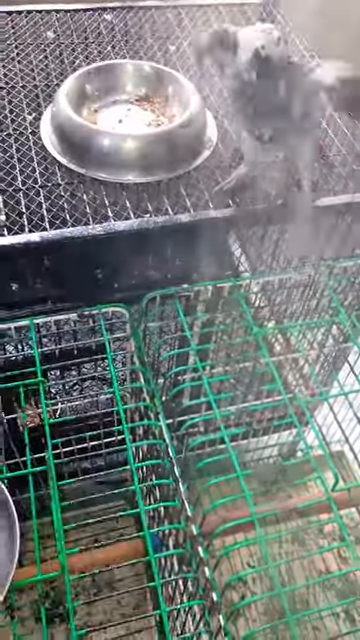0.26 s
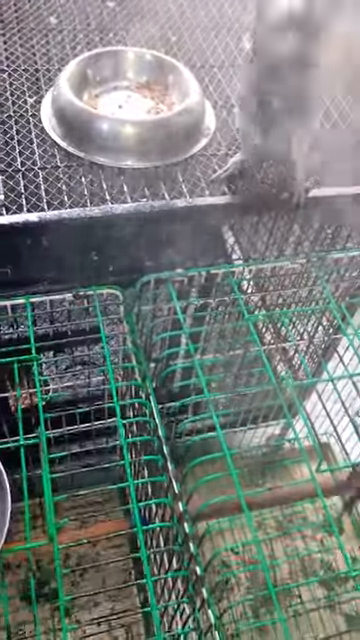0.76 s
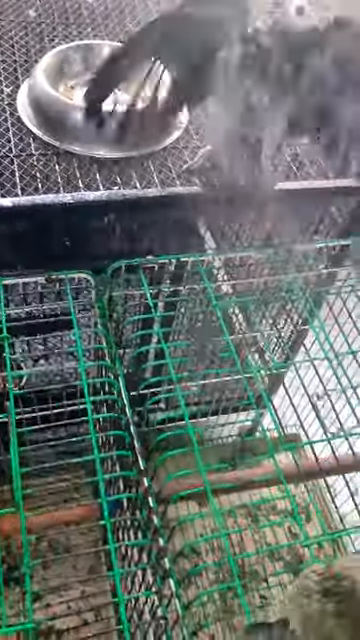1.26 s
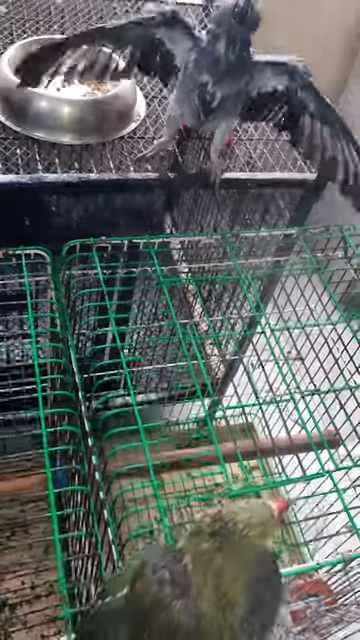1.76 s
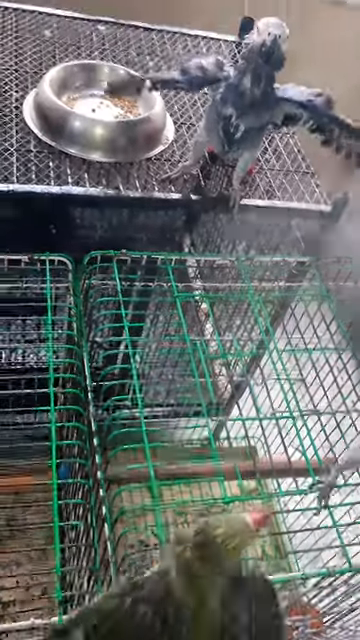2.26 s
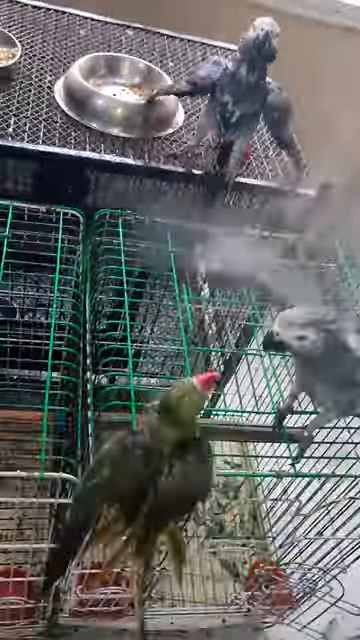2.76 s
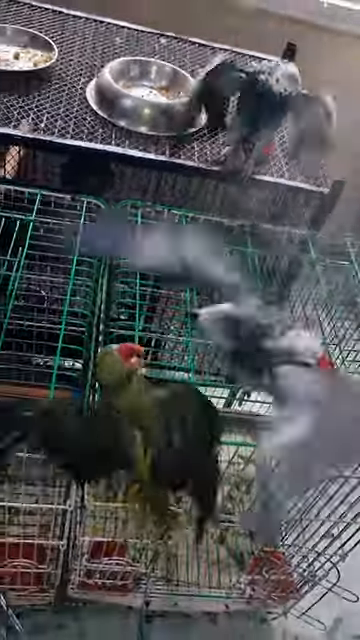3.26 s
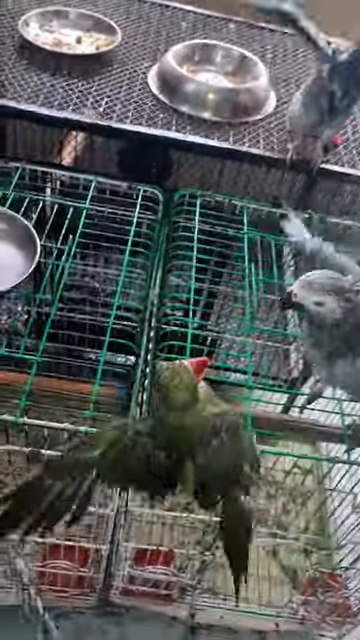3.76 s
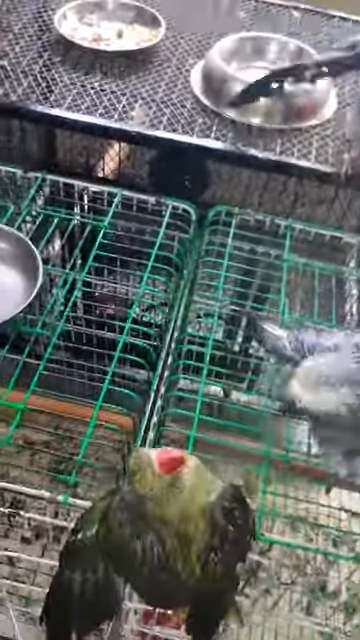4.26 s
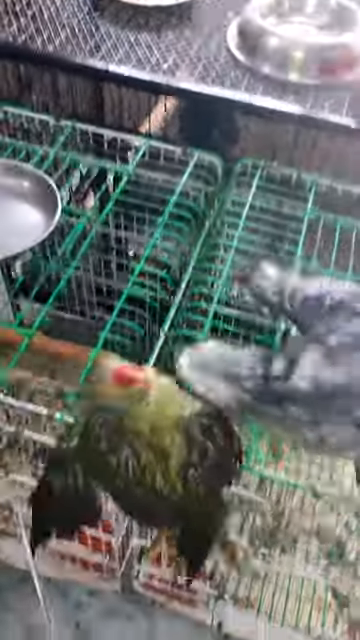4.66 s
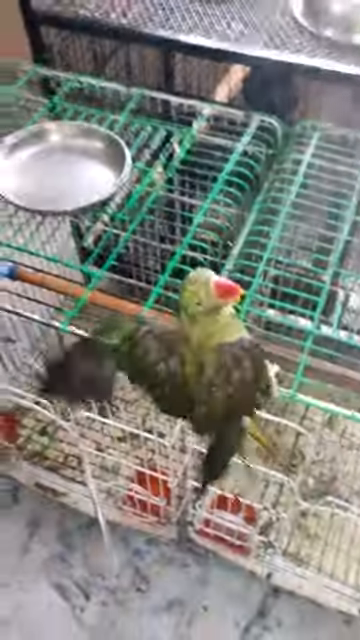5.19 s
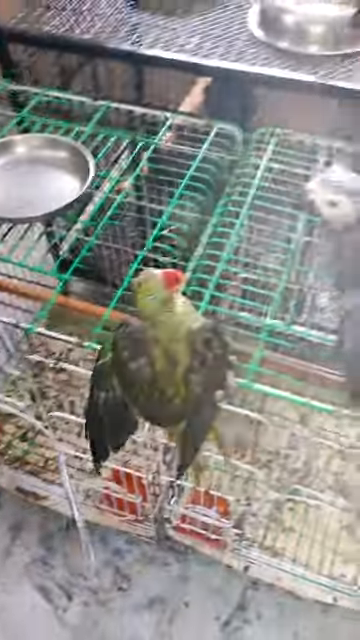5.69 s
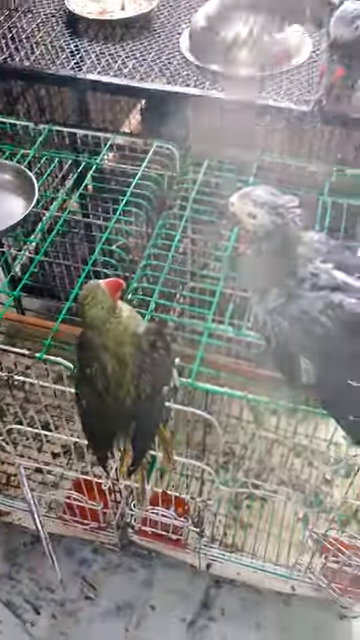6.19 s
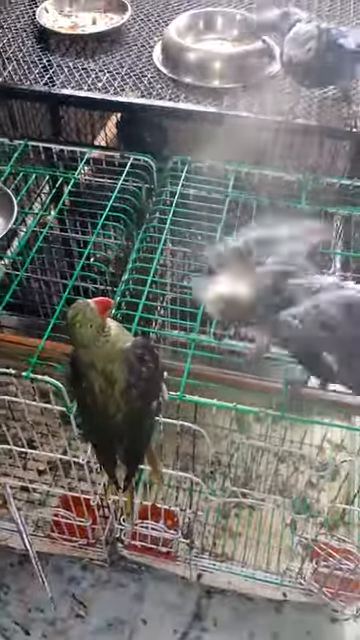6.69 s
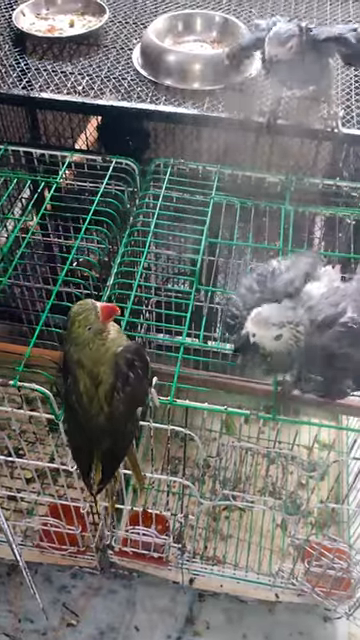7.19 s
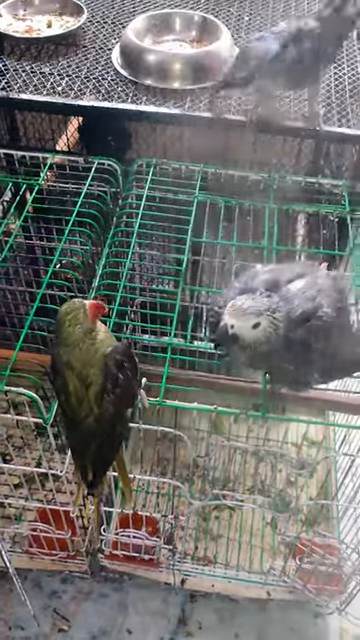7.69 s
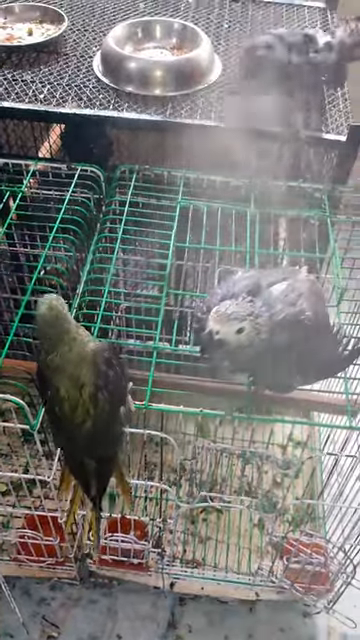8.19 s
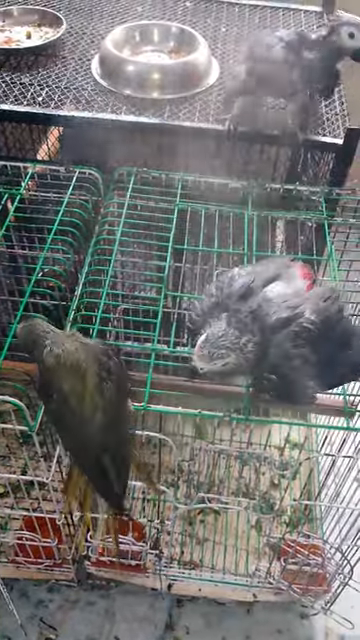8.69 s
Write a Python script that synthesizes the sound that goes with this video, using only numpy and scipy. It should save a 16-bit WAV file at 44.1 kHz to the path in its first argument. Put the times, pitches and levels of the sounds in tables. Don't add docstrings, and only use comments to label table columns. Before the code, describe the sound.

Several parrots squabble on wire cages indoors, with dense chirping, short harsh squawks, beating wings and sharp claw ticks on the mesh.

```python
import sys
import numpy as np
from scipy import signal
from scipy.io import wavfile
from scipy.ndimage import uniform_filter1d

SR = 44100
rng = np.random.default_rng(int(sys.argv[2]) if len(sys.argv) > 2 else 0)


def rack_gain(trim_db):
    fader = np.asarray(trim_db, float)
    return 10 ** (fader / 20)


def store_pcm(level_fs):
    pcm = np.round(np.clip(level_fs, -1, 1) * 32767).astype(np.int16)
    wavfile.write(sys.argv[1], SR, np.atleast_2d(pcm).T)


N = 394254

# t/s, length/s, throat start f/Hz, throat end f/Hz, level/dB
DEEP_SQUAWKS = [(1.227, 0.096, 2700, 2170, -21), (1.212, .1, 1510, 1070, -30.5),
                (2.279, 0.037, 1620, 1640, -26), (3.368, 0.11, 1360, 2600, -18.5),
                (4.83, .03, 670, 800, -29.5), (1.3, 0.0304, 4200, 5000, -29),
                (4.878, 0.062, 2700, 4100, -25), (4.856, 0.12, 4500, 4800, -33),
                (5.428, 0.11, 1060, 1010, -41), (5.428, 0.049, 2100, 2500, -24),
                (5.528, 0.083, 2200, 2400, -28.5), (5.841, 0.062, 2400, 1840, -26),
                (7.598, 0.1, 2000, 1810, -34.5)]
MIDDLE_SQUAWKS = [
    (3.204, .14, 1560, 1671, -31),
    (3.33, 0.081, 800, 1300, -27),
    (4.845, 0.094, 900, 1250, -23.5),
    (4.87, .065, 1750, 1850, -24),
]
SHRILL_SQUAWKS = [
    (2.388, 0.046, 890, 1520, -31.5),
    (5.097, 0.087, 800, 830, -36),
    (5.1, 0.071, 1650, 1700, -32),
]
DEEP_HZ, MIDDLE_HZ, SHRILL_HZ = 408.7, 582.4, 819
GRIT_DB = 3.5
# t/s, start f/Hz, end f/Hz, level/dB, fall per partial/dB
COOS = [
    (4.608, 360, 475, -46.5, 8),
    (5.814, 697, 376.4, -51, 8),
    (7.555, 723, 370, -52, 6),
    (8.9, 560, 640, -54.5, 11),
    (3.275, 638, 569, -45, 7),
    (5.095, 790, 815, -48, 7),
]
COO_S, COO_ROUGH = .12, .03

# t/s, length/s, loudest partial f/Hz, peak level/dB
CLEAR_CHIRPS = [(0.392, 0.023, 3590, -31), (2.847, 0.019, 3990, -30), (3.573, 0.071, 3360, -27.5),
                (4.423, 0.0064, 3425, -24), (4.659, 0.012, 3740, -24.5), (4.777, 0.006, 3440, -19),
                (5.956, 0.016, 3580, -26.5), (6.727, 0.039, 2860, -36.5), (6.789, 0.094, 2920, -46.5),
                (7.32, 0.046, 3380, -34), (7.861, 0.022, 3850, -25.5), (7.893, 0.077, 4080, -33),
                (.006, 0.052, 4915, -21.5), (0.045, 0.024, 6330, -27.5), (1.717, 0.092, 7000, -29.5),
               (2.855, 0.045, 6460, -29.5), (3.107, 0.077, 4920, -27), (3.317, 0.099, 5020, -25.5),
               (4.315, 0.034, 5600, -37.5), (4.636, 0.03, 6130, -31), (5.586, 0.062, 6460, -30),
               (5.626, 0.1, 5340, -26), (6.22, 0.022, 5720, -34), (6.329, 0.024, 5640, -27),
               (7.15, 0.045, 6110, -28.5), (7.225, 0.09, 5980, -38), (7.584, 0.055, 4870, -32),
               (8.046, 0.1, 4950, -35.5), (8.614, 0.06, 4980, -31.5)]
# t/s, length/s, loudest partial f/Hz, peak level/dB, glide ratio
SLIDING_CHIRPS = [(0.058, 0.045, 5200, -25, 1.06), (0.979, 0.15, 4400, -40, 0.89),
                  (1.4, 0.14, 3800, -27, 1.04), (2.831, 0.06, 4760, -22.5, 1.07),
                  (2.884, 0.061, 4790, -20, 1.115), (5.731, 0.018, 3450, -22, 1.07),
                  (3.72, 0.075, 4670, -20, 1.114), (3.285, 0.078, 4120, -34, 1.16),
                  (3.391, 0.065, 1449, -22.5, 1.38), (3.528, 0.046, 4870, -22, 1.01),
                  (3.669, 0.026, 3830, -27, 0.96), (3.691, 0.044, 4000, -25, 1.2),
                  (3.785, 0.037, 3667, -25, 1.13), (3.907, 0.041, 3800, -26.5, 1.17),
                  (3.946, 0.13, 4470, -40, 1.0), (4.552, 0.074, 3870, -37, 1.1),
                  (4.57, 0.064, 5830, -32, 1.04), (5.589, 0.065, 2430, -47, 0.75),
                  (6.189, 0.032, 3210, -30, 1.14), (6.304, 0.037, 3230, -27, 1.11),
                  (6.541, 0.055, 3157, -28, 1.075), (6.569, 0.075, 5700, -35.5, 0.9)]
# t/s, length/s, loudest partial f/Hz, peak level/dB
HELD_CALLS = [(.5, 0.052, 4200, -32.5), (.84, .05, 2700, -39.5), (.99, 0.05, 4300, -40),
              (1.14, .06, 5400, -29), (1.16, 0.036, 2800, -33), (2.73, 0.11, 2100, -43.5),
              (3.08, 0.037, 6300, -34), (3.491, 0.037, 4060, -29), (3.52, .1, 6870, -39),
              (3.57, .06, 4900, -30), (4.028, 0.067, 3360, -36), (6.071, 0.031, 3350, -37),
              (6.425, 0.037, 3310, -33), (3.83, 0.085, 3800, -30), (4.64, 0.044, 2050, -45),
              (4.66, 0.066, 2750, -36), (4.8, 0.028, 5500, -33), (4.93, 0.025, 2400, -29),
              (5.435, 0.045, 3350, -25.5), (5.445, 0.03, 4600, -44), (5.48, 0.045, 5900, -42.5),
              (5.525, 0.09, 4000, -40), (5.53, .05, 3250, -31), (5.62, 0.042, 2150, -40),
              (5.76, 0.067, 5900, -42), (5.86, 0.056, 5700, -46), (5.85, 0.03, 3300, -27),
              (6.06, 0.04, 4800, -32.5), (6.6, 0.11, 2000, -45), (7.23, 0.054, 3600, -39),
              (7.7, 0.065, 3300, -46)]
# t/s, length/s, loudest partial f/Hz, peak level/dB
RASPS = [(0.296, .084, 4975, -22.5), (0.461, 0.039, 4190, -30.5), (0.614, 0.051, 4170, -31.5),
         (0.636, 0.053, 4710, -27.5), (1.229, 0.055, 2717, -19), (1.72, 0.18, 4950, -27),
         (1.944, 0.098, 5070, -29.5), (2.355, 0.14, 4990, -25), (2.401, 0.016, 1636, -32.5),
         (2.579, 0.11, 4130, -32.5), (3.731, 0.041, 4790, -24.5), (4.008, 0.084, 4200, -40),
         (4.02, 0.049, 3410, -34.5), (4.301, 0.08, 3950, -40), (4.209, .04, 5880, -42.5),
         (4.011, 0.01, 2054, -39), (4.431, .05, 2180, -45), (1.47, .09, 3000, -29),
         (4.534, 0.019, 3270, -25.5), (4.618, 0.037, 4740, -25.5), (4.875, 0.064, 1815, -27.5),
         (4.881, 0.053, 3500, -26), (5.129, 0.022, 1661, -27), (5.293, 0.024, 3690, -37),
         (5.519, 0.057, 2390, -31), (7.099, 0.12, 2044, -38.5), (7.11, 0.082, 4340, -34.5),
         (7.695, 0.053, 4710, -28.5), (7.787, 0.041, 3520, -30.5), (7.88, 0.04, 2078, -39),
         (7.974, 0.059, 3080, -29), (8.802, 0.18, 4950, -37)]
CLEAR_ROUGH, SLIDE_ROUGH, HELD_ROUGH = .02, .058, .035
RASP_GLIDE, RASP_ROUGH, RASP_DB_PER_DB = 1.025, .085, .5
# t/s, length/s, top f/Hz, peak level/dB, droop share
ARCHED_CALLS = [
    (2.735, 0.071, 6350, -26, 0.091),
    (3.79, .07, 4250, -33, 0.0814),
    (7.088, .05, 6300, -38, .03),
    (3.05, 0.0225, 3600, -34, 0.094),
]
# t/s, peak level/dB, f/Hz
WHISTLES = [
    (5.7604, -20.5, 11740),
    (5.861, -23, 11630),
    (5.9808, -22, 12150),
    (6.1027, -22, 11870),
    (6.224, -28.5, 11320),
    (6.338, -27, 11270),
    (6.4526, -35, 10860),
    (6.5794, -31.5, 11200),
    (7.155, -24.5, 12430),
]
PERCH_PAN_DB = -6, 4
SIDE_LEAD = 21

# t/s, air push level/dB, feather rustle level/dB
WING_BEATS = [(.349, -41, -36.5), (.499, -48, -50), (.648, -50, -42), (0.78, -36, -32), (.955, -29, -32),
              (1.119, -26.5, -36.5), (1.222, -48.5, -32), (1.419, -48, -45.5), (3.389, -31, -41),
              (4.078, -61, -47), (5.491, -39, -42), (7.015, -63.5, -51), (8.565, -60, -42.5)]
BOUT_START_S, BEAT_S, BOUT_PUSH_DB, BOUT_RUSTLE_DB = 1.576, .1408, -30.5, -41.5
WIRE_SNAP_S, WIRE_SNAP_DB = 6.088, -28
# t/s, peak level/dB, f/Hz
TICKS = [(0.1404, -29, 5340), (0.773, -18, 8730), (0.9094, -20, 5680), (1.2264, -11, 4830),
         (1.663, -22, 8490), (4.0352, -21, 4480), (4.3046, -20, 6040), (4.4354, -27, 5650),
         (5.0174, -17, 5030), (5.0557, -18, 4820), (5.1034, -35, 5180), (5.2984, -20.5, 4510),
         (5.4324, -31, 5420), (5.441, -20, 4590), (5.5544, -17, 4590), (7.396, -20, 5570),
         (7.7045, -20, 4510), (8.804, -34, 5750)]

# t/s, hold/s, level/dB
BIG_FLOCK = [(0, 0.21, -37.5), (0.248, 1, -37), (1.193, 0.19, -30), (1.545, 1, -39), (2.392, 0.24, -36.5),
             (2.815, 0.22, -36.5), (3.245, 0.11, -29.5), (3.407, 0.033, -19.5), (3.702, 0.61, -45),
             (4.425, 0.46, -37), (4.855, 0.071, -25), (5.128, 0.023, -26.5), (5.433, 0.49, -38.5),
             (5.947, 0.22, -50), (6.18, 0.52, -42.5), (7.022, 0.43, -44.5), (7.41, 0.49, -38),
             (8.017, 0.51, -47.5), (8.214, 0.054, -45), (8.593, 0.032, -41), (8.807, .15, -46)]
# t/s, hold/s, voices level/dB, feather and wire hiss level/dB
SMALL_FLOCK = [(0, 0.18, -23.5, -37.5), (0.274, 0.4, -21, -36), (0.637, 0.24, -25.5, -42),
               (0.903, 0.46, -26.5, -37), (1.224, 0.056, -13.5, -38), (1.42, 0.12, -21, -39),
               (1.639, 0.31, -22, -36.5), (2.003, 0.21, -24.5, -40.5), (2.308, 0.12, -25.5, -36.5),
               (2.57, 0.091, -23.5, -40), (2.792, 0.077, -23, -33), (3.024, 0.17, -24.5, -42),
               (3.303, 0.18, -23.5, -40.5), (3.536, 0.38, -25.5, -41), (3.92, 0.15, -32, -45),
               (4.278, 0.032, -30.5, -69), (4.44, 0.15, -33.5, -50.5), (4.557, 0.11, -26, -41),
               (4.783, 0.22, -30, -56), (5.296, 0.55, -36, -48.5), (5.528, 0.13, -28, -35.5),
               (5.822, 0.29, -31, -52), (6.176, 0.32, -34, -56.5), (6.583, 0.07, -34.5, -49),
               (7.011, .07, -49, -58), (7.05, .05, -44, -48), (7.09, 0.14, -28, -44),
               (7.397, 0.26, -33, -50), (7.715, 0.21, -26.5, -43), (8.022, 0.29, -34.5, -52.5),
               (8.574, 0.036, -35.5, -48.5), (8.82, 0.067, -36.5, -52.5)]
# f/Hz, density level/dB per Hz
CROWD_COLOUR = [(600, -15), (1200, -28.5), (1680, -8.5), (2940, -2), (8610, -13), (9560, -22), (12300, -13),
                (14500, -16)]
SWELL_DB_PER_S, FADE_DB_PER_S, HUSH_DB = 1100, 93.5, -61
SNAPS_PER_S, SNAP_DB = 34, 2.2

# f/Hz, level/dB
STREET_COLOUR = [(12, -30), (20, 6), (230, 1), (406, -8), (561, -10.5), (1390, -10), (1960, -17.5)]
STREET_DB = -54
# t/s, level/dB
TRAFFIC = [
    (0.0, -51),
    (1.69, -45.5),
    (2.6, -47.5),
    (4, -55.5),
    (6.0, -55),
    (7.2, -58),
    (8.94, -53.5),
]
# start t/s, end t/s, f/Hz, level/dB
DRONES = [
    (0, 0.853, 134.5, -53),
    (1.55, 2.41, 213.7, -50),
    (2.33, 2.925, 159.5, -46),
    (2.95, 3.498, 209.7, -56),
    (7.903, 8.543, 119, -58),
    (8.552, 9.2, 108.7, -56.5),
]
ROOM_T60_S, ROOM_DB = .5, -2.5
AIR_DB = -63
# f/Hz, width/Hz, depth/0-1
SPECTRAL_DIPS = [
    (3167, 176, 0.48),
    (7950, 760, 0.2),
    (9630, 590, 0.15),
]


def rms_one(x):
    return x / np.sqrt(np.mean(x ** 2) + 1e-20)


def drift(rate, size):
    knots = rng.standard_normal(int(size * rate / SR) + 2)
    return np.interp(np.arange(size) * rate / SR, np.arange(len(knots)), knots)


def wobble(rate, u):
    knots = rng.standard_normal(int(rate / 3) + 2)
    x = np.interp(np.arange(len(u)) * rate / SR, np.arange(len(knots)), knots)
    return x - x.mean()


def band(x, low_hz, high_hz):
    return signal.sosfilt(signal.butter(2, [low_hz, min(high_hz, .45 * SR)], "band", fs=SR, output="sos"), x)


def add(out, s, sound, pan_db, lead=4):
    lead = round(lead)
    for side, sign in enumerate((1, -1)):
        at = max(round(s * SR) + max(-sign * lead, 0), 0)
        piece = sound[:max(N - at, 0)]
        out[side, at:at + len(piece)] += rack_gain(sign * pan_db / 2) * piece


def span(length):
    return np.linspace(0, 1, max(round(length * SR), 64))


def squawk(pitch_hz, length, start_hz, end_hz):
    u = span(length)
    phase = 2 * np.pi * np.cumsum(pitch_hz * (1 + .07 * wobble(300, u))) / SR
    throat_hz = start_hz + (end_hz - start_hz) * u
    voice = 0
    for k in np.arange(1, 7000 // pitch_hz, .5):
        near = np.log(k * pitch_hz / throat_hz)
        upper = np.log(k * pitch_hz / (1.9 * throat_hz))
        gain = 1 / (1 + (near / .13) ** 2) + .35 / (1 + (upper / .2) ** 2)
        partial_db = -6.5 * (k % 1 > 0) + 4 * wobble(200, u)
        voice = voice + gain * rack_gain(partial_db) * np.sin(k * phase)
    envelope = np.minimum(u * length / .0051, 1) * np.sqrt(1 - u ** 2)
    grit = rack_gain(GRIT_DB * wobble(110, u))
    return band(band(rms_one(voice) * envelope * grit, 480, 6900), 420, 9000)


def coo(start_hz, end_hz, fall_db):
    u = span(COO_S)
    slide_hz = start_hz + (end_hz - start_hz) * np.sin(np.pi / 2 * u) ** 2
    phase = 2 * np.pi * np.cumsum(slide_hz * (1 + COO_ROUGH * wobble(153, u))) / SR
    voice = sum(rack_gain(-fall_db * k) * np.sin((k + 1) * phase) for k in range(4))
    return voice * np.sqrt(np.sin(np.pi * u).clip(0))


def parrots():
    out = np.zeros((2, N))
    birds = (DEEP_HZ, DEEP_SQUAWKS), (MIDDLE_HZ, MIDDLE_SQUAWKS), (SHRILL_HZ, SHRILL_SQUAWKS)
    for pitch_hz, squawks in birds:
        for s, length, start_hz, end_hz, level_db in squawks:
            add(out, s, rack_gain(level_db) * squawk(pitch_hz, length, start_hz, end_hz), -2.5, 8)
    for s, start_hz, end_hz, level_db, fall_db in COOS:
        add(out, s, rack_gain(level_db + 10.5) * coo(start_hz, end_hz, fall_db), -3)
    return out


def chirp(length, hz, glide, rough, others_db, breath_db, droop=0):
    u = span(min(length, .3))
    order = max(round(hz / 2100), 1)
    swoop = (np.clip(glide, .85, 1.3) - 1) * (1 - (1 - u) ** 2)
    onset = .045 * np.exp(-u * length / .008)
    arch = droop * abs(2 * u - .9) ** 2.5
    waver = .7 * (rough + .004) * wobble(900, u)
    phase = 2 * np.pi * np.cumsum(hz / order * (1 + swoop - onset - arch + waver)) / SR
    tone = sum(rack_gain(-others_db * np.sqrt(abs(k - order))) * np.sin(k * phase) for k in range(1, 7))
    breath = rack_gain(breath_db) * band(rng.standard_normal(SR // 3)[:len(u)], 1900, 9400)
    flutter = rack_gain(2.84 * wobble(188, u))
    return (tone + breath) * np.minimum(u * length / .009, 1) * np.sqrt(1 - u ** 3) * flutter


def whistle(hz):
    u = span(.093)
    phase = 2 * np.pi * np.cumsum(hz * (1 - .0468 * (1 - u) ** 3 + .021 * wobble(379, u))) / SR
    voice = np.sin(phase) + .45 * np.sin(phase / 2)
    return voice * np.minimum(9 * u, 1) * (1 - u)


def small_birds():
    out = np.zeros((2, N))
    calls = [(*row, 1, CLEAR_ROUGH) for row in CLEAR_CHIRPS]
    calls += [(*row, SLIDE_ROUGH) for row in SLIDING_CHIRPS]
    calls += [(*row, 1, HELD_ROUGH) for row in HELD_CALLS]
    calls += [(*row, RASP_GLIDE, RASP_ROUGH * rack_gain(RASP_DB_PER_DB * (row[3] + 30))) for row in RASPS]
    for s, length, hz, peak_db, glide, rough in calls:
        voice = chirp(length + .0148, hz, glide, rough, others_db=19.8, breath_db=-15)
        add(out, s, rack_gain(peak_db + 3.5 + 6.1 * rough) * voice, rng.uniform(*PERCH_PAN_DB), SIDE_LEAD)
    for s, length, hz, peak_db, droop in ARCHED_CALLS:
        voice = chirp(length + .016, hz, 1, CLEAR_ROUGH, others_db=14, breath_db=-12, droop=droop)
        add(out, s, rack_gain(peak_db + 2.5) * voice, -2, SIDE_LEAD)
    for s, peak_db, hz in WHISTLES:
        add(out, s - .008, rack_gain(peak_db - 5) * whistle(hz), 3, SIDE_LEAD)
    return out


def wings():
    push, rustle = np.zeros((2, N)), np.zeros((2, N))
    t = np.arange(round(.12 * SR)) / SR
    bout = [(BOUT_START_S + k * BEAT_S, BOUT_PUSH_DB, BOUT_RUSTLE_DB) for k in range(10)]
    for s, push_db, rustle_db in WING_BEATS + bout:
        air = -np.sin(2 * np.pi * 36 * t) * np.exp(-t / .015)
        add(push, s, rack_gain(push_db + .5) * air, 0)
        grains = rng.standard_normal(len(t)) * rack_gain(1.65 * drift(115, len(t)))
        feathers = band(grains * np.minimum(t / .017, 1) * np.exp(-t / .052), 334, 1220)
        add(rustle, s, rack_gain(rustle_db + 13) * feathers, -1.5)
    snap = band(np.exp(-t / .0001) * 6, 150, 7700)
    add(push, WIRE_SNAP_S, rack_gain(WIRE_SNAP_DB) * snap, -4)
    return push, rustle


def claws():
    out, t = np.zeros((2, N)), np.arange(round(.04 * SR)) / SR
    for s, peak_db, hz in TICKS:
        crack = rng.standard_normal(len(t)) * np.exp(-t / .0024)
        tick = rack_gain(peak_db - 4.5) * band(crack, hz / 2.4, hz * 1.33)
        add(out, s, tick, rng.uniform(*PERCH_PAN_DB), SIDE_LEAD)
    return out


def colour_db(points, hz):
    return np.interp(np.log(hz), np.log(np.array(points)[:, 0]), np.array(points)[:, 1])


def outbursts(t, s, hold, level_db):
    late = t[:, None] - s
    db = level_db - SWELL_DB_PER_S * (-late).clip(0) - FADE_DB_PER_S * (late - hold).clip(0)
    return 10 * np.log10(np.sum(rack_gain(2 * db), axis=1) + rack_gain(2 * HUSH_DB))


def crowd():
    hop = 128
    hz, t, noise = signal.stft(rng.standard_normal((2, N)), SR, nperseg=512, noverlap=512 - hop)
    cells = noise.shape[1:]
    born = rng.random(cells) < 260 * hop / SR / len(hz)
    born = born * rack_gain(3 * rng.exponential(1, cells).clip(0, 3))
    wide = uniform_filter1d(uniform_filter1d(born, size=4, axis=0), size=3, axis=0)
    fade = rack_gain(-120 * hop / SR / .58)
    power = signal.lfilter([1], [1, -fade], uniform_filter1d(wide, size=12, axis=1), axis=1)
    power = power / power.mean() + .5
    flutter = 5 * drift(45, N + 256)[::hop][:len(t)]
    power = power * rack_gain(np.outer(np.clip(hz / 7000, 0, 1), flutter))
    snaps = (rng.random(len(t)) < SNAPS_PER_S * hop / SR) * rng.exponential(1, len(t)).clip(0, 2.5)
    snaps = signal.lfilter([1], [1, -.55], snaps)
    power = power * rack_gain(2 * SNAP_DB * np.outer(np.clip(hz / 6000 - .4, 0, 1), snaps))
    s, hold, voices_db, hiss_db = np.transpose(SMALL_FLOCK)
    levels = [outbursts(t, *np.transpose(BIG_FLOCK)),
              outbursts(t, s, hold, voices_db), outbursts(t, s, hold, hiss_db)]
    share = np.interp(np.log(hz + 1), np.log([2400, 4800, 10000]), [0, 1, 2])
    effort_db = sum(np.outer((1 - abs(share - k)).clip(0), db) for k, db in enumerate(levels))
    colour = colour_db(CROWD_COLOUR, hz + 1) - np.interp(share, [0, 1, 2], [33, 37, 26])
    bursts = noise * np.sqrt(power) * rack_gain(effort_db + colour[:, None] + 47.5)
    return signal.istft(bursts, SR, nperseg=512, noverlap=512 - hop)[1][:, :N]


def patchy(points, low_hz, high_hz, patch_db, alike, count):
    out, edges = 0, np.geomspace(low_hz, high_hz, count + 1)
    white = rng.standard_normal((2, 2, N))
    share = np.clip(alike, 0, 1)
    for k, (low, high) in enumerate(zip(edges, edges[1:])):
        mid, side = band(white[k % 2], low, high)
        swell_db = patch_db * (drift(7.8, N) + .5 * drift(41, N))
        gain = rack_gain(colour_db(points, np.sqrt(low * high)) + swell_db)
        out = out + gain * (np.sqrt(1 + share) * mid + np.sqrt(1 - share) * side * [[1], [-1]])
    return rms_one(out)


def street():
    rumble_db = np.interp(np.arange(N) / SR, *np.transpose(TRAFFIC))
    out = rack_gain(rumble_db + 1.5) * patchy(STREET_COLOUR, 16.6, 308, 1.1, .92, count=6)
    out += rack_gain(STREET_DB) * patchy(STREET_COLOUR, 308, 1500, .6, .5, count=4)
    for start, end, hz, level_db in DRONES:
        u = span(min(end - start, 1))
        phase = 2 * np.pi * np.cumsum(hz * (1 + .043 * drift(11.46, SR)[:len(u)])) / SR
        level = rack_gain(level_db + 3.5 + 3.8 * drift(12.6, SR)[:len(u)])
        add(out, start, level * np.sin(phase) * np.sin(np.pi * u).clip(0) ** .081, 0)
    return out


def bird_house(x):
    t = np.arange(SR) / SR
    tail = rng.standard_normal((2, SR)) * rack_gain(-60 * t / ROOM_T60_S) * (t > .004)
    tail = tail / np.sqrt(np.sum(tail ** 2, axis=1, keepdims=True))
    return x + rack_gain(ROOM_DB) * signal.fftconvolve(x.mean(0, keepdims=True), tail, axes=1)[:, :N]


def scene():
    far = crowd() + street()
    push, rustle = wings()
    room = bird_house(rustle + claws() + parrots() + small_birds())
    air = rack_gain(AIR_DB) * band(rng.standard_normal((2, N)), 1500, 8000)
    return room + push + far + air


def drop_weak_bands(x, under_db, tilt_db):
    hz, t, cells = signal.stft(x, SR, nperseg=1024, noverlap=512)
    power = uniform_filter1d(np.sum(abs(cells) ** 2, axis=0), size=3, axis=1)
    near = uniform_filter1d(power, size=5, axis=0)
    around = np.exp(uniform_filter1d(np.log(power + 1e-18), size=30, axis=0))
    limit_db = under_db - tilt_db * np.log2(hz[:, None] / 3000 + .033)
    keep = (near > around * rack_gain(-2 * limit_db)) | (hz[:, None] < 1400)
    return signal.istft(cells * keep, SR, nperseg=1024, noverlap=512)[1][:, :N]


def low_pass(x):
    return signal.sosfilt(signal.butter(12, 15080, fs=SR, output="sos"), x)


def record(dry):
    x = dry + band(dry, 6070, 13000) * [[.4], [-.33]]
    for hz, width_hz, depth in SPECTRAL_DIPS:
        x = x - np.clip(depth, 0, 1) * band(x, hz - width_hz / 2, hz + width_hz / 2)
    rounded = .8 * np.tanh(x / .8)
    thinned = drop_weak_bands(rounded, under_db=7.6, tilt_db=3)
    top = signal.cheby2(10, 60, 15000, fs=SR, output="sos")
    return low_pass(signal.sosfilt(top, thinned))


dry = scene()
out = record(dry)
store_pcm(out)
```